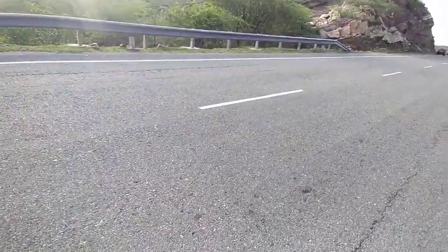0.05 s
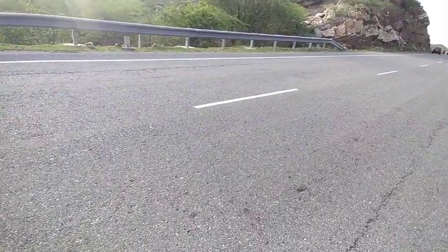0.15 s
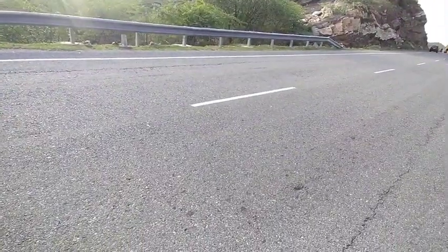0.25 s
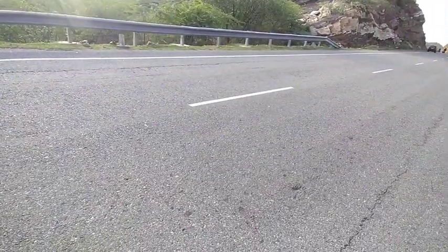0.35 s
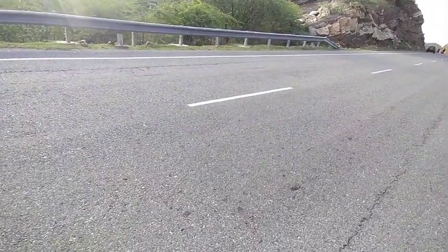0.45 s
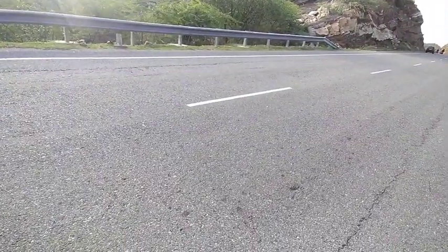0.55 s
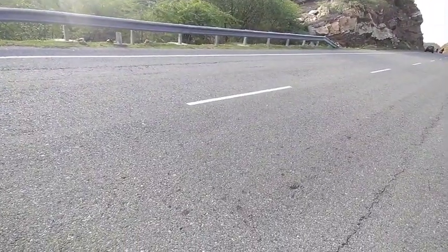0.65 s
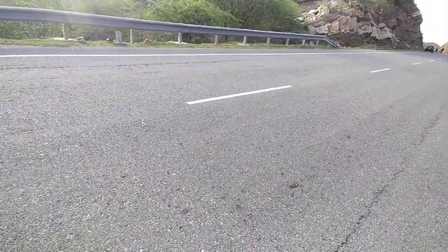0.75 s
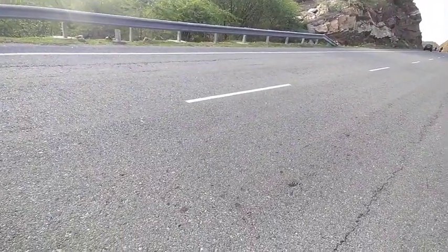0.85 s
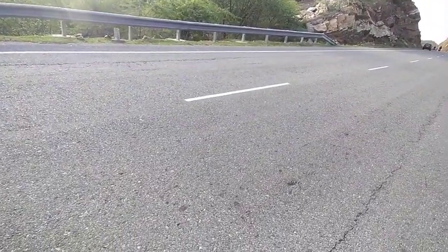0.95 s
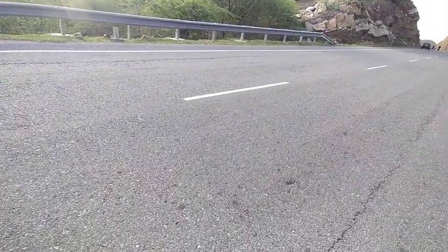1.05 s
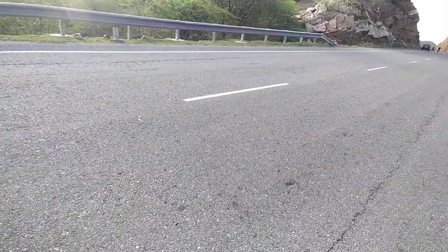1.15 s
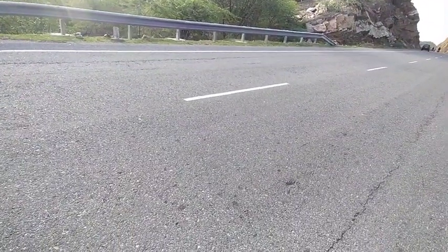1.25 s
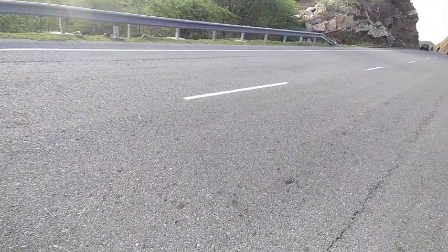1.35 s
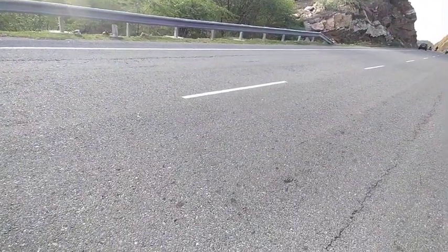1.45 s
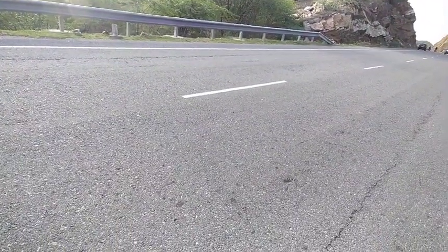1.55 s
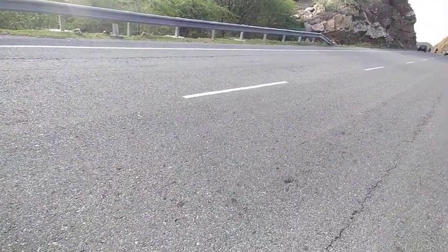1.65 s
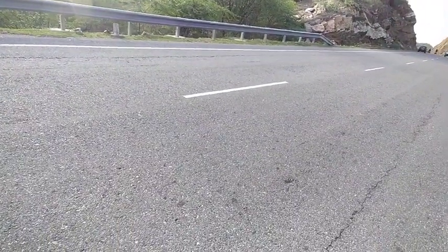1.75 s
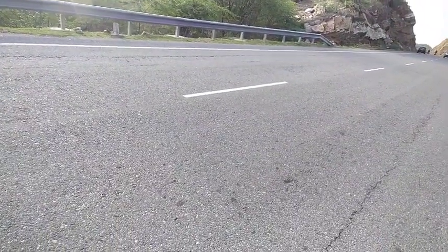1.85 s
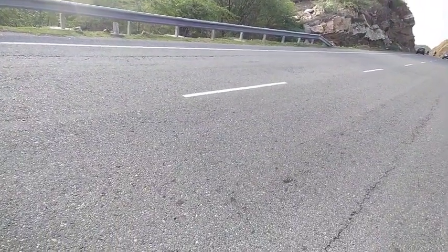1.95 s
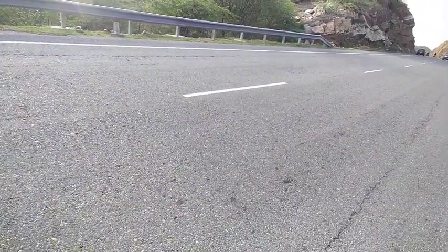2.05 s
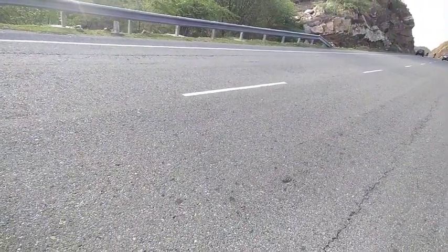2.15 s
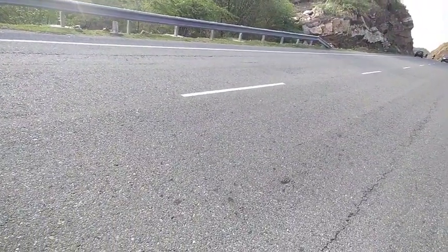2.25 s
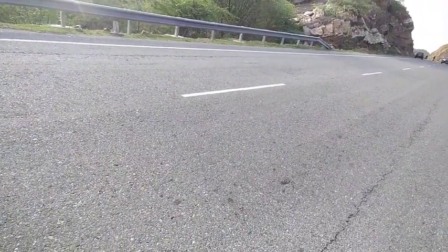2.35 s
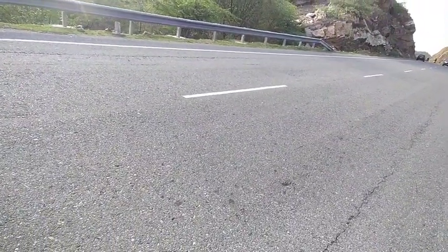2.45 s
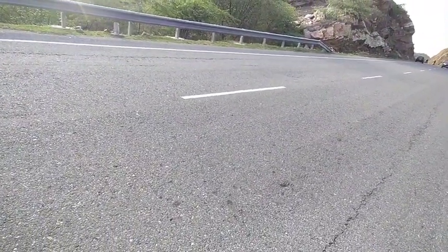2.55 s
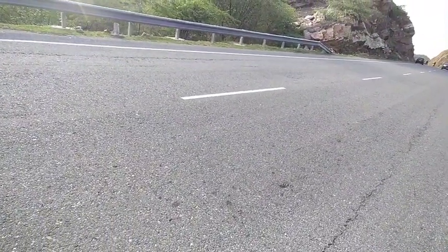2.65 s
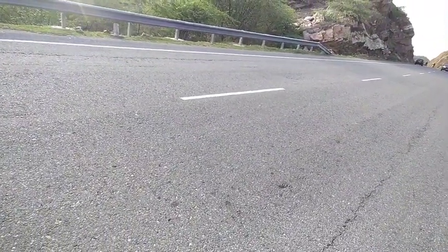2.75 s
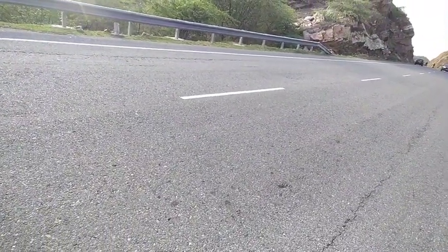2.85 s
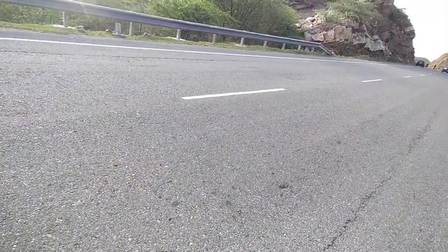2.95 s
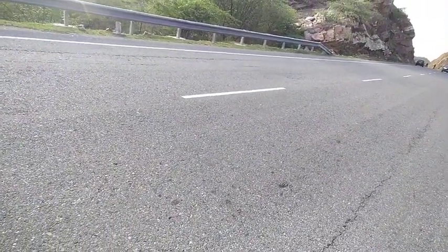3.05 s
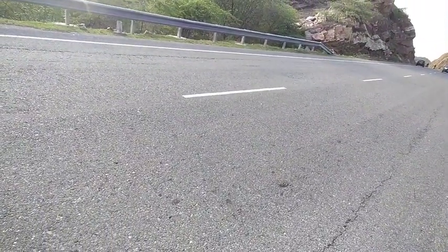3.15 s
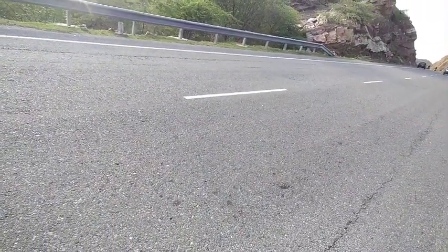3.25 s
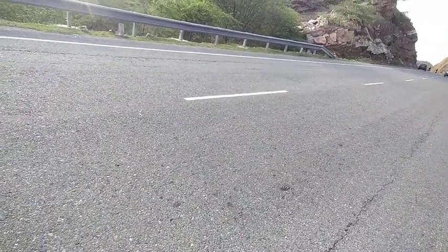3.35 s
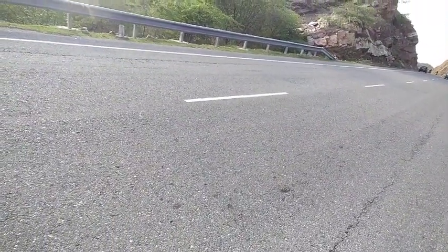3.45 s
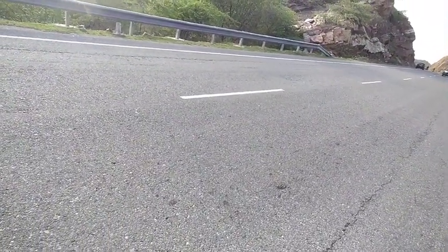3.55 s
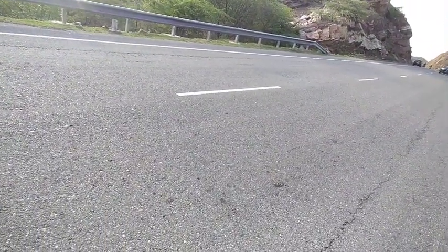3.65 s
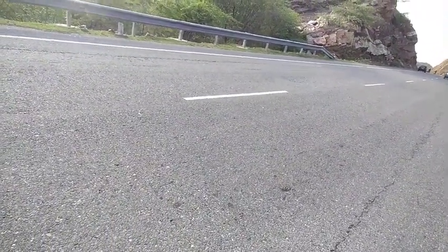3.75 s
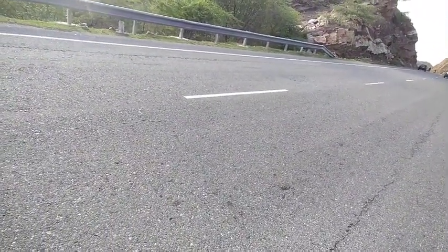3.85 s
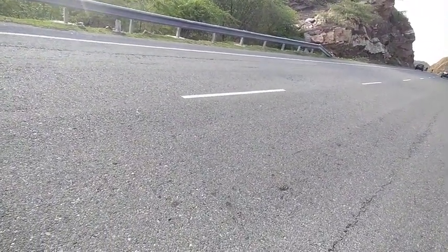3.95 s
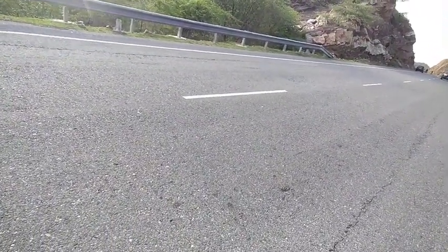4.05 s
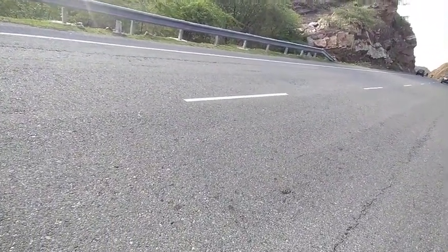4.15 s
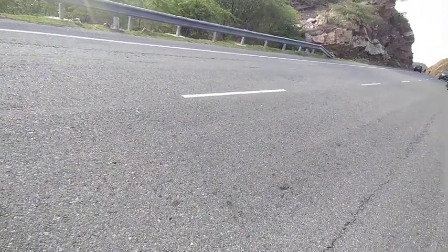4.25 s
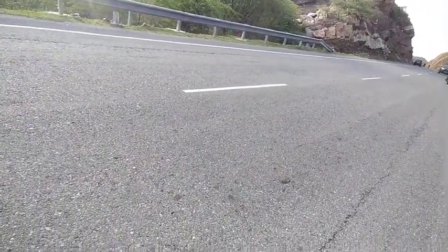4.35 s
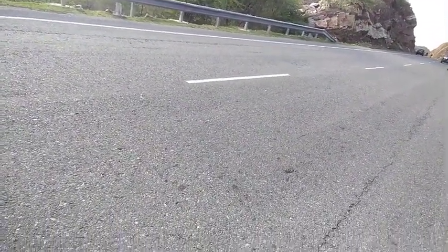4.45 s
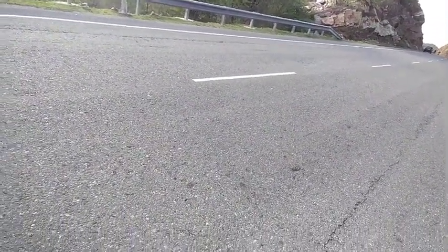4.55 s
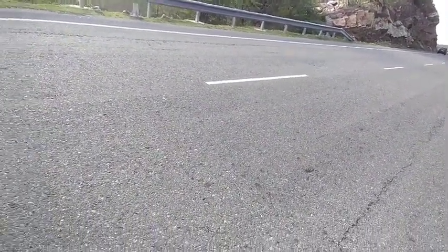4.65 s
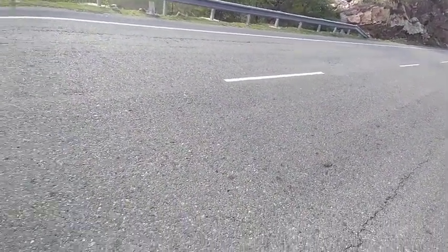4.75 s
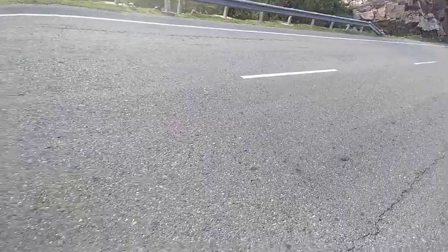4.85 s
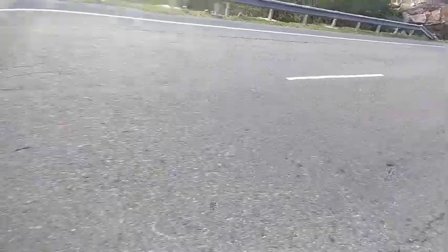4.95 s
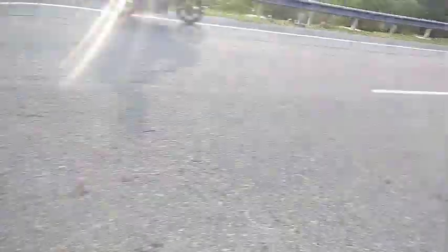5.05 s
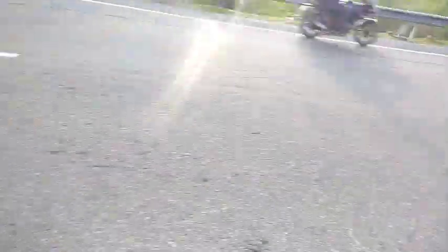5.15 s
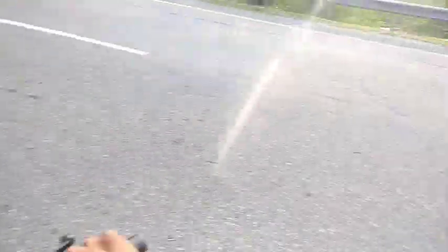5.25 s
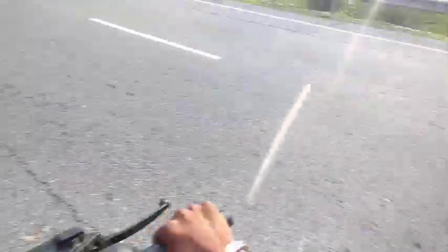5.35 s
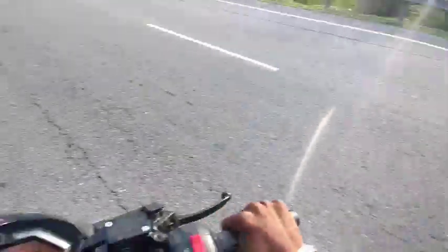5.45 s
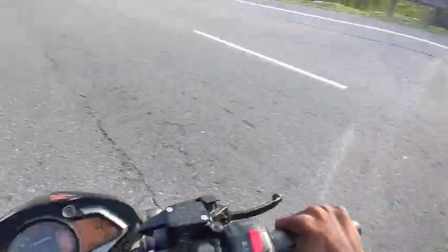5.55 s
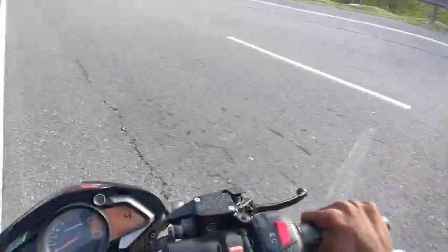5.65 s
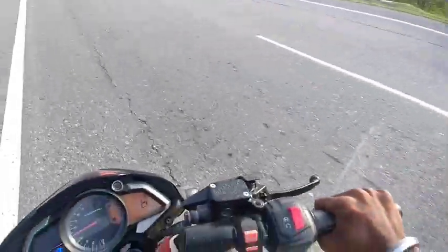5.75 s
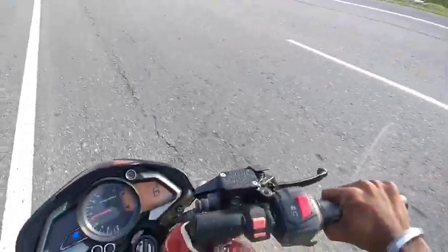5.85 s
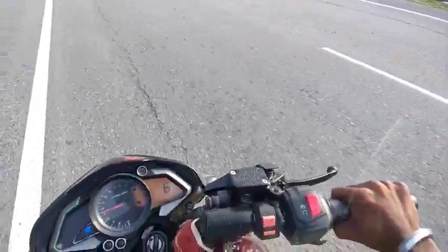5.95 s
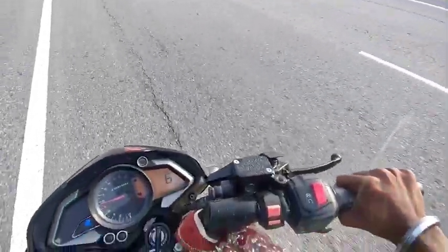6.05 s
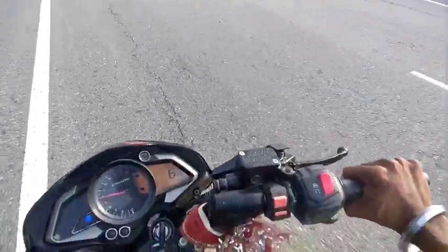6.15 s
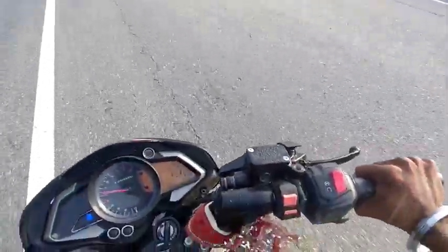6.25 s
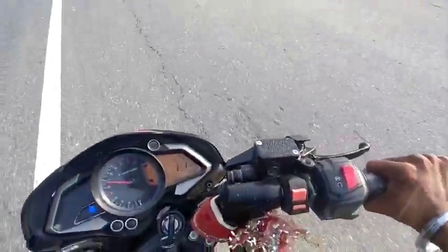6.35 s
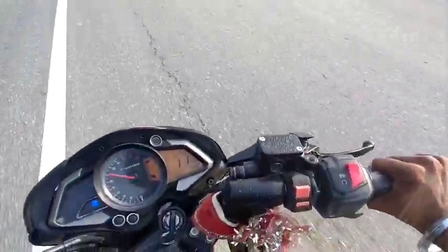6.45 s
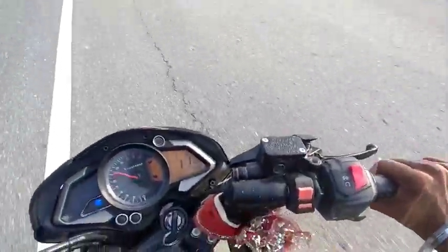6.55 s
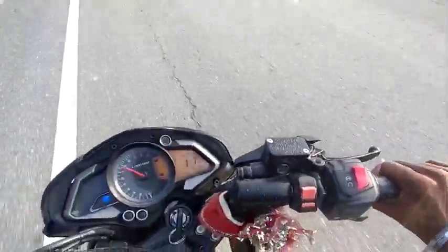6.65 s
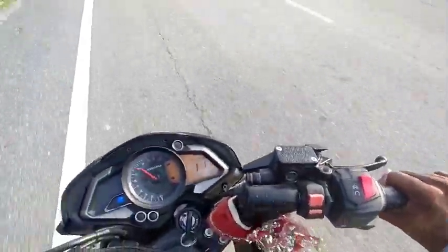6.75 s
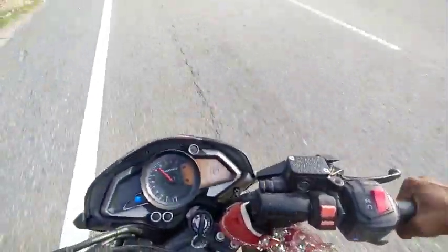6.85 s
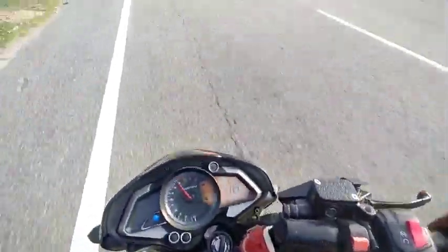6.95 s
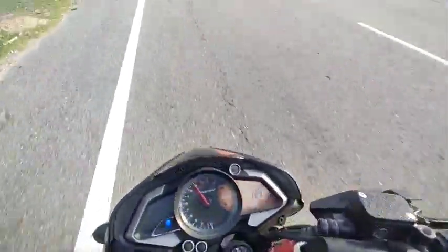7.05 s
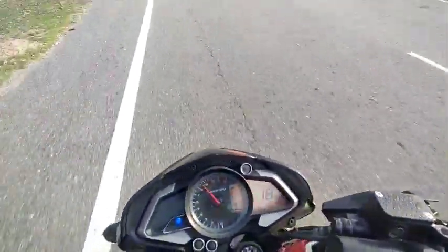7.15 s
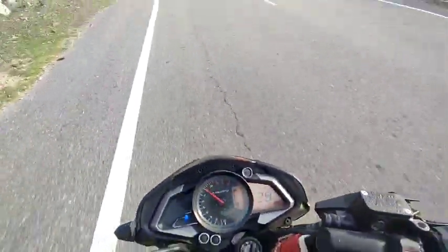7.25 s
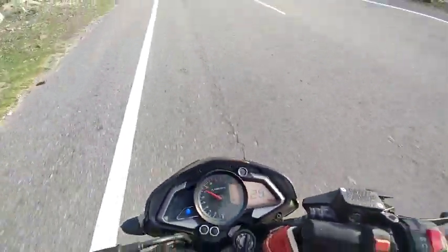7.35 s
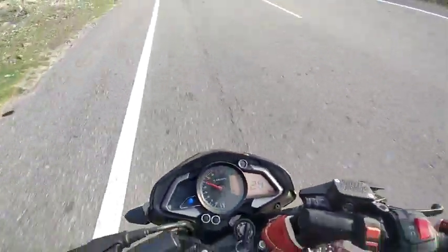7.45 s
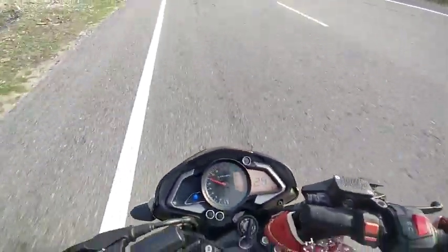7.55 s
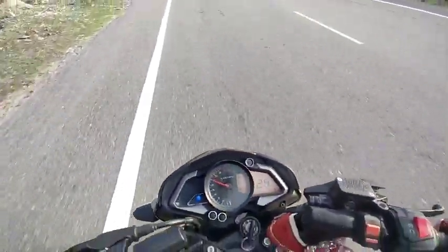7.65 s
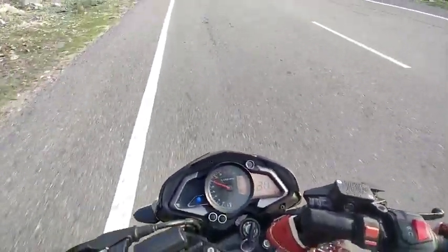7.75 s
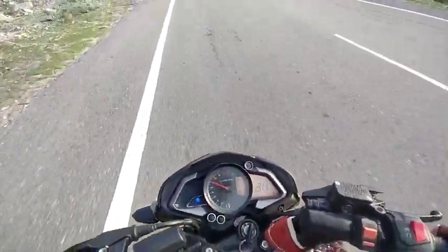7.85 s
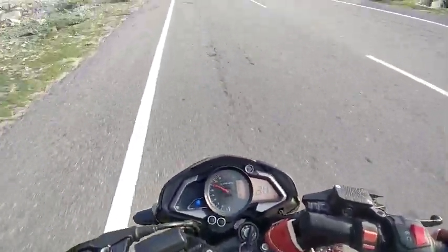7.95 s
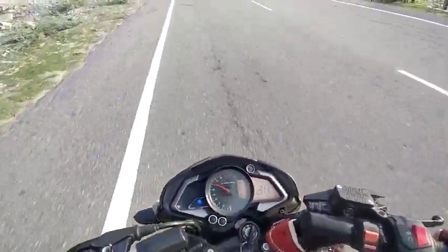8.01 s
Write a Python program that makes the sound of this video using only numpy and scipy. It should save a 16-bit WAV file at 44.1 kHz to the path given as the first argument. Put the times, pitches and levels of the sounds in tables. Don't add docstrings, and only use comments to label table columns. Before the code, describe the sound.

Outdoor, narrow and slightly muffled helmet microphone. Quiet idle and distant bird whistles first, with soft wind thumps; another motorcycle's throbbing exhaust grows near, dips as it changes gear, then coasts boomily. The rider's own engine blips, clicks into gear, labours on the clutch and climbs in pitch, drops at a gear change, and wind buffeting and crackling take over.

```python
import sys
import numpy as np
from scipy import signal
from scipy.fft import rfft, irfft, next_fast_len
from scipy.io import wavfile
from scipy.ndimage import uniform_filter1d, minimum_filter1d, map_coordinates

SR = 44100
rng = np.random.default_rng(int(sys.argv[2]) if len(sys.argv) > 2 else 0)


def generate_wav(sig):
    pcm = np.round(np.clip(np.atleast_2d(sig).T, -1, 1) * 32767).astype(np.int16)
    wavfile.write(sys.argv[1], SR, pcm)


def magnitude_from_level(level_db):
    exponent = np.asarray(level_db, float) / 20
    return 10 ** exponent


N = 356307

# time_s, crank_hz
ENGINE = [(0, 24.6), (1.4, 24.8), (1.85, 35.9), (2.3, 55.8), (2.65, 48.4), (3.6, 74.9), (5.1, 29.8),
          (5.31, 31.8), (5.65, 41.2), (6.17, 51.2), (6.52, 64.3), (6.7, 69), (6.88, 74.8), (7, 76.5),
          (7.11, 74.2), (7.3, 66.5), (7.44, 51.7), (8.08, 61)]
# time_s, load_share (0-1)
LOAD = [(0, 0), (4.6, 0), (5.1, .25), (5.65, .7), (6.05, .85), (6.27, 1), (7.15, 1), (7.19, .78),
        (7.76, .8), (7.84, .93), (8.08, .98)]
IDLE_HZ = 24.6
# idle_db, rise_db_per_octave of speed, full_load_db
EXHAUST = (-58, 17, -8)
INTAKE = (-55, 5.5, 28)
DRONE = (-88.5, 18, 47)
CLATTER = (-60.5, 5.7, 18)
# crank_order, level_db
ORDERS_DB = [(.5, -8), (1, -7.5), (1.5, -3.5), (2, 7), (2.5, -5), (3, -16), (3.5, -11.5), (4, -14),
             (6, -32.5), (8, -29)]
# crank_order, level_db
FRAME_ORDERS = [(3, -3.5), (4, 0), (5, -2), (6, -6), (7, -6)]
# centre_hz, width_hz, level_db
FRAME = [(293, 34, 0)]
FRAME_OCTAVE = [(600, 160, -15)]
# centre_hz, width_hz, level_db
CASES = [(1860, 100, 1), (2500, 930, -1.5), (3520, 1200, -4.5), (3840, 16, 8.5), (4740, 970, -4),
         (5640, 160, -6.5)]
# start_s, end_s, level_db
SHAKES = [
    (4.85, 5.297, 4),
    (6.14, 6.22, 4.5),
    (6.278, 6.466, 3.5),
    (6.502, 6.622, 6),
    (6.677, 6.707, 4.5),
    (6.728, 6.8, 4),
    (6.825, 6.847, 6),
    (6.917, 7.018, 5),
    (7.027, 7.139, -3.5),
    (7.15, 7.197, 3),
]
# start_s, end_s, centre_hz, width_hz, level_db
LOOSE = [(5.945, 6.008, 2647, 14, -28), (6.012, 6.062, 2647, 14, -29), (6.072, 6.15, 2650, 14, -34),
         (6.153, 6.168, 2640, 14, -28), (5.96, 6.14, 3050, 25, -42), (6.3, 6.5, 3390, 110, -33),
         (6.27, 6.4, 4240, 90, -39), (6.27, 6.82, 5555, 130, -40), (6.3, 7, 3057, 60, -42),
         (6.72, 6.85, 4800, 200, -40), (7.15, 7.8, 4474, 90, -40), (7.15, 8.1, 3870, 110, -36),
         (5.5, 5.95, 3870, 90, -45), (4.86, 4.97, 2200, 90, -42), (5.55, 5.9, 3400, 130, -45),
         (6.85, 7.03, 3750, 200, -39), (6.1, 6.75, 1450, 70, -39)]
LAUNCH_START_S, LAUNCH_END_S, LAUNCH_RISE_S = 5.3, 6.25, 0.2

# time_s, firing_hz, distance_m
PASSING = [(0, 38.73, 63), (.4, 40.7, 50), (.75, 41.88, 39), (1.2, 43.61, 30), (1.65, 45.37, 22),
           (2.2, 47.57, 18), (2.85, 50.1, 14.5), (3.1, 51.03, 14), (3.25, 50.31, 14), (3.36, 46.97, 13.5),
           (3.45, 47.84, 13.5), (3.55, 50.32, 13), (3.8, 48.98, 12.5), (4.35, 47.49, 11),
           (4.8, 46.09, 10.5), (5.25, 44.65, 10), (5.6, 43, 11), (6.2, 41, 50)]
NEAREST_M = 10
# centre_hz, width_hz, level_db
PIPE_CRACK = [(484, 584, 0)]
PIPE_RING = [(672, 80, 0)]
# centre_hz, width_hz, level_db
PIPE_TIP = [(960, 90, 0)]
# centre_hz, width_hz, level_db
THUMP = [(144, 60, 0)]
# centre_hz, width_hz, level_db over the crack
SHOULDERS = [(310, 90, -3), (760, 120, -9)]
SHIFT_S, SHIFT_LENGTH_S, SHIFT_DIP_DB = 3.25, .28, -7

# time_s, level_db
WIND = [(0, -39.5), (.4, -36.5), (1.39, -39.5), (2.0, -36), (3.24, -36.5), (3.6, -41.5), (4.03, -34.5),
        (4.48, -34.5), (5.08, -26.5), (5.6, -26), (6.03, -22), (6.21, -20), (6.39, -20.5), (6.55, -17),
        (6.93, -18.5), (7.3, -14), (7.6, -14.5), (8.08, -16.5)]
# frequency_hz, level_db per Hz
BUFFET = [(15, -48.5), (30, -36.5), (55, -25), (105, -2), (160, 3.5), (230, 0.5), (320, -4), (500, -25),
          (900, -28.5), (2000, -120)]
FLUTTER = [(210, -37.5), (350, 0), (619, -4), (744, -7.5), (970, -11), (1490, -15), (3230, -26),
           (4000, -26), (5200, -44), (8800, -120)]
RASP = [(290, -26), (500, -12), (1490, 4.5), (3240, -13), (3850, -34), (5000, -32), (6500, -57),
        (11000, -120)]
PASSING_TYRES = [(210, -39), (350, -7.5), (523, -9.5), (655, -6.5), (752, -18.5), (954, -4), (1340, -15),
                 (2180, -15.5), (2980, -25.5), (4630, -23.5), (5800, -25.5), (7000, -32), (9100, -73),
                 (15400, -120)]
OWN_TYRES = [(410, -22), (700, -8), (1730, -8), (2210, -6), (2540, -10), (4700, -9.5), (6210, -12),
             (7500, -28), (9750, -86), (16500, -120)]
ROLL_S = 4.41
HEAD_UP_S = 7.17

# start_s, end_s, first_hz, last_hz, level_db
BIRDS = [
    (0, 0.07, 2650, 2500, -59),
    (0.502, 0.623, 1910, 2010, -61),
    (0.74, 0.842, 2190, 2370, -60),
    (1.21, 1.332, 2400, 2370, -66),
]
# time_s, peak_db, length_s
GUST = [(0.066, -28.5, 0.013), (0.524, -21.5, 0.0052), (0.546, -13, 0.006), (0.577, -17.5, .009),
        (0.789, -27, 0.017), (1.077, -17.5, 0.005), (1.099, -22.5, .006), (1.396, -27, 0.021),
        (1.802, -31, 0.15), (2.277, -23, .0033), (2.837, -19.5, 0.0049), (4.603, -21.5, 0.025),
        (5.042, -11.5, 0.004), (5.454, -22, 0.027), (5.871, -17, 0.015), (6.112, -1.5, .012),
        (6.252, -10, 0.025), (6.53, -13, 0.029), (6.599, -9.5, 0.046), (7.006, -5.5, 0.0062),
        (7.193, -16, 0.0063), (7.282, -2.5, .006), (7.32, -4.5, 0.0047)]
# time_s, peak_db, length_s, top_hz
WHOOP = [
    (0.558, -17, 0.0046, 343),
    (1.059, -22, 0.0087, 230),
    (2.275, -23.5, .012, 278),
    (5.036, -14, 0.0065, 266),
    (5.041, -17.5, .003, 620),
    (5.502, -22.5, .02, 206),
    (6.108, -11.5, 0.022, 666),
    (6.224, -7.5, .014, 221.3),
]
# time_s, peak_db, t60_s
CLICKS = [
    (4.121, -13, 0.042),
    (4.157, -36.5, 0.069),
    (4.184, -23.5, 0.039),
]
# centre_hz, width_hz, level_db
LEVER = [(1050, 500, -2), (2400, 1300, -3), (5000, 2200, 0)]
# time_s, peak_db, pitch_hz
SNAPS = [(5.6456, -22.5, 1460), (5.8034, -17, 1003), (5.8554, -19, 920), (5.9074, -21.5, 1445),
         (6.2437, -20, 1000), (6.2791, -16.5, 1160), (6.3054, -22, 1370), (6.4604, -17.5, 1380),
         (6.5114, -11, 1186), (6.5817, -14, 917), (6.6067, -17.5, 958), (6.671, -14.5, 884),
         (6.6914, -13.5, 970), (6.7396, -15, 993), (6.8738, -15.5, 902), (6.9137, -13.5, 1150),
         (6.9481, -13, 938), (7.0156, -13.5, 1074), (7.0404, -14, 1290), (7.07, -17.5, 910),
         (7.1217, -18, 974), (7.2082, -11.5, 1027), (7.2731, -9.5, 1000), (7.2789, -6.5, 920),
         (7.2852, -6, 1165), (7.314, -11, 934), (7.3246, -13.5, 1230), (7.3414, -12, 897),
         (7.3535, -13, 1190), (7.3874, -11.5, 1180), (7.4105, -10.5, 1015), (7.4594, -15.5, 1030),
         (7.5155, -5.5, 1267), (7.63, -12.5, 1510), (7.6519, -5.5, 1240), (7.6641, -10.5, 1600),
         (7.732, -9.5, 922), (7.7706, -15, 1010), (7.8755, -13.5, 982), (7.9207, -13, 1450),
         (7.9702, -10.5, 1244), (8.0102, -9, 1886), (8.0185, -10, 920), (8.0301, -6, 886),
         (8.0425, -13.5, 950)]
# frequency_hz, level_db
MICROPHONE = [(20, -51.5), (55, -10.5), (100, 1), (160, 2.5), (5600, -1.5), (6400, -10), (7000, -22),
              (7500, -21.5), (7790, -19.5), (8000, -61), (20000, -87)]


def unit(x):
    return x / np.sqrt(np.mean(x ** 2) + 1e-20)


def along(points, hz):
    f, v = np.transpose(points)
    return np.interp(np.log(hz + 1e-3), np.log(f), v)


def curves(rows):
    s, *cols = np.transpose(rows)
    return [np.interp(np.arange(N) / SR, s, c) for c in cols]


def wobble(rate):
    return map_coordinates(rng.standard_normal(N // 40), [np.arange(N) * rate / SR])


def filtered(x, response):
    m = next_fast_len(len(x) + 8192)
    return irfft(rfft(x, m) * response(np.fft.rfftfreq(m, 1 / SR)), m)[:len(x)]


def modes(table):
    def response(f):
        total = 0
        for k, (centre, width, db) in enumerate(table):
            total = total + (-1) ** k * magnitude_from_level(db) * 1j * f * width / (centre ** 2 - f * f + 1j * f * width)
        return total
    return response


def rush(spectrum, patchy_db):
    z = signal.stft(rng.standard_normal(N), nperseg=512)[2]
    field = uniform_filter1d(rng.standard_normal(z.shape), size=6, axis=0)
    field = uniform_filter1d(field, size=8, axis=1)
    noise = signal.istft(z * magnitude_from_level(patchy_db * unit(field)), nperseg=512)[1][:N]
    return unit(filtered(noise, lambda hz: magnitude_from_level(along(spectrum, hz))))


def pulses(turns, scatter_db):
    at = np.flatnonzero(np.diff(np.floor(turns)))
    spikes = np.zeros(N)
    spikes[at] = magnitude_from_level(scatter_db * rng.standard_normal(N // 100)[:len(at)])
    return spikes


def window(start, end, edge):
    t = np.arange(N) / SR
    return np.clip(np.minimum(t - start, end - t) / edge, 0, 1)


def loose_parts(shake):
    t, buzz = np.arange(N) / SR, 0
    for start, end, hz, width, db in LOOSE:
        drive = rng.standard_normal(N) + 3 / width * np.sin(2 * np.pi * hz * t)
        ringing = filtered(drive, modes([(hz, width, 0)])) * (width * shake + 25)
        ringing = unit(filtered(ringing, modes([(hz, 4 * width, 0)])))
        buzz = buzz + magnitude_from_level(db) * window(start, end, 0.006) * ringing
    return buzz


def own_engine():
    (crank_hz,), (load,) = curves(ENGINE), curves(LOAD)
    octaves = np.log2(crank_hz / IDLE_HZ)
    exhaust_db, intake_db, drone_db, clatter_db = (
        idle_db + rise_db * octaves + load_db * load
        for idle_db, rise_db, load_db in (EXHAUST, INTAKE, DRONE, CLATTER))
    turns = np.cumsum(crank_hz) / SR

    def tone(order):
        return magnitude_from_level(1.5 * wobble(13)) * np.sin(2 * np.pi * order * turns + 0.3 * wobble(25) + order * order)

    overrun = uniform_filter1d(1. * (np.gradient(crank_hz) < 0), size=4000)
    exhaust = sum(magnitude_from_level(along(ORDERS_DB, k / 2) + 4.9 * overrun * (k % 2)) * tone(k / 2) for k in range(1, 17))
    intake = tone(3) + magnitude_from_level(-16) * tone(6)
    drone = sum(magnitude_from_level(db) * tone(k) for k, db in FRAME_ORDERS)
    drone = filtered(filtered(drone, modes(FRAME)), modes(FRAME))
    drone = drone + filtered(drone ** 2, modes(FRAME_OCTAVE))

    blows = pulses(turns, scatter_db=-0.5) + 1.2 * pulses(turns / 2, scatter_db=1.5)
    blows = blows + 1.3 * pulses(turns + 0.28, scatter_db=3.5)
    shake = signal.fftconvolve(blows, magnitude_from_level(-60 * np.arange(2000) / SR / .032))[:N]
    clatter = unit(filtered((.2 + shake) * rng.standard_normal(N), modes(CASES)))
    clatter_db = clatter_db + sum(db * window(a, b, 0.011) for a, b, db in SHAKES) + 0.61 * wobble(11)

    launch = window(LAUNCH_START_S, LAUNCH_END_S, LAUNCH_RISE_S)
    airbox_db = -11 * np.clip((crank_hz - 72) / 4, 0, 1)
    intake_db = intake_db + 5.5 * launch - 20 * overrun + airbox_db
    tonal = magnitude_from_level(exhaust_db - 5.5 + 19 * launch) * exhaust + magnitude_from_level(intake_db) * intake + magnitude_from_level(drone_db + 6.5) * drone
    moan = magnitude_from_level(-18) * window(7.27, 7.5, 0.034) * tone(4.4)
    return tonal + moan + magnitude_from_level(clatter_db) * clatter + loose_parts(shake)


def spreading_db():
    return -20 * np.log10(curves(PASSING)[1] / NEAREST_M)


def passing_engine():
    firing_hz, t = curves(PASSING)[0], np.arange(N) / SR
    coasting = window(SHIFT_S, 9, .05)
    lag_s = .0052 - .0001 * t
    dip_db = SHIFT_DIP_DB * window(SHIFT_S, SHIFT_S + SHIFT_LENGTH_S, SHIFT_LENGTH_S / 2)
    crack_db = -38 + spreading_db() + dip_db + 0.5 * coasting
    ring_db = -38.5 + spreading_db() + dip_db - 13 * coasting
    boom_db = -36.5 + .65 * spreading_db() + 4.5 * coasting

    turns = np.cumsum(firing_hz) / SR - .198 + .004 * wobble(20)
    direct = pulses(turns, scatter_db=0.5)
    rebound = filtered(pulses(turns - lag_s * firing_hz, scatter_db=1.5), lambda f: 1 / (1 + (f / 400) ** 2))
    spikes = direct + 0.94 * rebound
    hiss = signal.fftconvolve(abs(direct), magnitude_from_level(-60 * np.arange(1500) / SR / .02))[:N] * rng.standard_normal(N)

    def pipe_mode(x, table):
        return unit(filtered(x, lambda f: modes(table)(f) ** 2))

    crack = unit(spikes) + .15 * unit(hiss)
    crack = unit(filtered(crack, lambda f: (modes(PIPE_CRACK)(f) / (1 + 1j * f / 1000)) ** 2))
    crack = crack + sum(magnitude_from_level(db) * pipe_mode(direct, [(hz, width, 0)]) for hz, width, db in SHOULDERS)
    ring = unit(filtered(-direct, lambda f: modes(PIPE_RING)(f) * modes([(672, 170, 0)])(f) ** 2))
    tip = window(3.3, 9, 1.3) * unit(filtered(filtered(direct, modes(PIPE_TIP)), modes(PIPE_TIP)))
    pulling, rolling = pipe_mode(spikes, [(255, 100, 0)]), pipe_mode(spikes, [(205, 100, 0)])
    boom = (1 - coasting) * pulling + coasting * rolling + magnitude_from_level(-3) * pipe_mode(direct, THUMP)
    bike = magnitude_from_level(crack_db) * crack + magnitude_from_level(ring_db) * ring + magnitude_from_level(crack_db - 5) * tip + magnitude_from_level(boom_db) * boom
    return bike * window(-1, 6.356, .2)


def air():
    t = np.arange(N) / SR
    buffet_db, = curves(WIND)
    wind_trend_db = uniform_filter1d(buffet_db, size=round(.5 * SR))
    flutter_db = -42 + 1.14 * (wind_trend_db + 33.5)
    rolling = magnitude_from_level(-35 + 1.5 * (t - ROLL_S)) * window(ROLL_S, 9, 0.94)
    tyres = magnitude_from_level(-38.5 + 1.44 * spreading_db()) * rush(PASSING_TYRES, patchy_db=2.0)
    tyres = tyres + rolling * rush(OWN_TYRES, patchy_db=2.0)
    eddies = wobble(35)
    buffet = unit(magnitude_from_level(2.0 * eddies + 0.79 * wobble(15)) * rush(BUFFET, patchy_db=1.0))
    flutter = unit(magnitude_from_level(.7 * eddies + 3 * wobble(150)) * rush(FLUTTER, patchy_db=1.2))
    flutter = flutter * (0.66 + window(5.21, 19, 0.5))
    rasp = unit(magnitude_from_level(4.2 * wobble(170) + .7 * wobble(30)) * rush(RASP, patchy_db=.8))
    rasp = magnitude_from_level(-24.5) * window(HEAD_UP_S, 9, 0.12) * rasp
    return rasp + magnitude_from_level(buffet_db) * buffet + magnitude_from_level(flutter_db) * flutter + tyres


def birds():
    t, calls = np.arange(N) / SR, 0
    for start, end, hz, last_hz, db in BIRDS:
        since = t - start
        cycles = hz * since + (last_hz - hz) * since ** 2 / (end - start) / 2
        calls = calls + magnitude_from_level(db + 2.2 * wobble(40)) * window(start, end, 0.017) * np.sin(2 * np.pi * cycles)
    return calls


def puffs():
    out = np.zeros(N + SR)
    t = np.arange(-8000, 8000) / SR
    for s, db, length in GUST:
        top_hz = 300 * 2 ** (.55 * max(s - ROLL_S, 0)) if s < HEAD_UP_S else 1700
        dull = filtered(rng.standard_normal(len(t)),
                        lambda f: f ** 2 / (f ** 2 + 130 ** 2) / (1 + (f / top_hz) ** 3))
        swell = dull * np.exp(-(t / length) ** 2 / 2)
        out[round(s * SR):][:len(t)] += magnitude_from_level(db) * swell / abs(swell).max()
    return out[8000:N + 8000]


def whoops():
    t, out, low_hz = np.arange(N) / SR, 0, 150.3
    for s, db, length, top_hz in WHOOP:
        swell = np.exp(-((t - s) / length) ** 2 / 2)
        pitch_hz = low_hz + (top_hz - low_hz) * np.where(t < s, swell ** 2, 1)
        envelope = np.exp(-((t - s) / length / np.where(t < s, 1.4, .6)) ** 2 / 2)
        rough = magnitude_from_level(db + 2 * wobble(140))
        out = out + rough * envelope * np.sin(2 * np.pi * np.cumsum(pitch_hz) / SR)
    return out


def gear_lever():
    t = np.arange(N) / SR
    bursts = sum(magnitude_from_level(db - 60 * abs(t - s) / t60) * window(s, 9, 0.0085) for s, db, t60 in CLICKS)
    return bursts * unit(filtered(rng.standard_normal(N), modes(LEVER)))


def snaps():
    out, t = np.zeros(N + SR), np.arange(-300, 300) / SR
    for s, db, hz in SNAPS:
        phase = rng.uniform(0, 2 * np.pi)
        torn = filtered(rng.standard_normal(len(t)), modes([(1.6 * hz, hz, 0)]))
        wiggle = np.sin(2 * np.pi * hz * t + phase) + 0.49 * unit(torn)
        wiggle = wiggle * np.exp(-(t * hz / 1.2) ** 2 / 2)
        out[round((s + .0015) * SR):][:len(t)] += magnitude_from_level(db + 4.5) * wiggle / abs(wiggle).max()
    return out[300:N + 300]


def scene():
    engines = own_engine() + passing_engine()
    return (engines + air() + birds() + puffs() + whoops() + gear_lever() + snaps())[None]


def band_limit(x):
    return signal.sosfilt(signal.butter(12, 7800, fs=SR, output="sos"), x)


def record(dry):
    x = filtered(dry[0], lambda hz: magnitude_from_level(along(MICROPHONE, hz)))
    needed = np.minimum(1, .57 / (abs(x) + 1e-9))
    gain = uniform_filter1d(minimum_filter1d(needed, size=401), size=400)
    return band_limit((x * gain)[None])


dry = scene()
out = record(dry)
generate_wav(out)
```